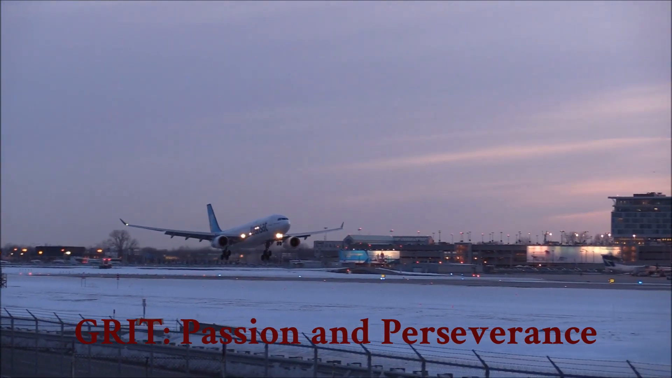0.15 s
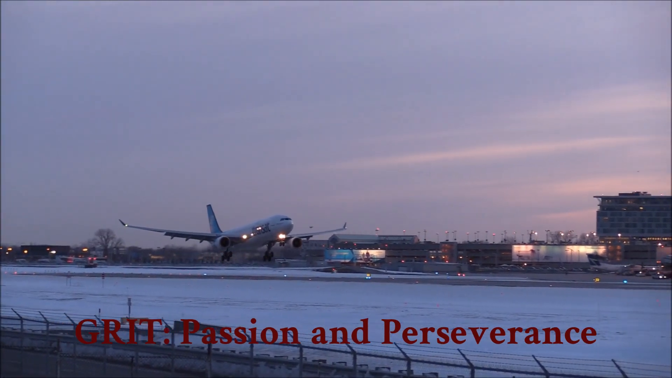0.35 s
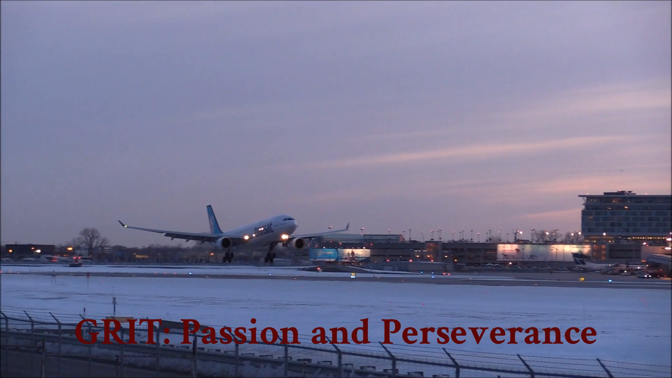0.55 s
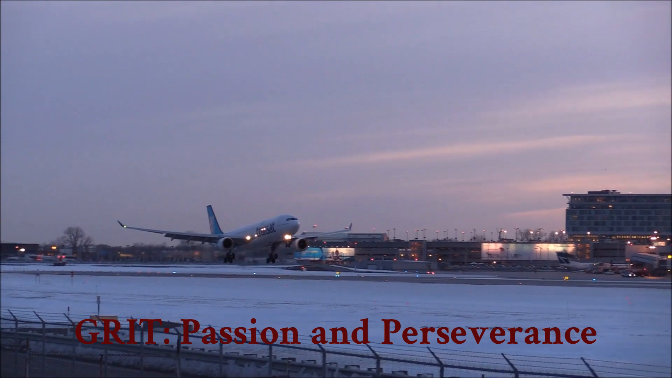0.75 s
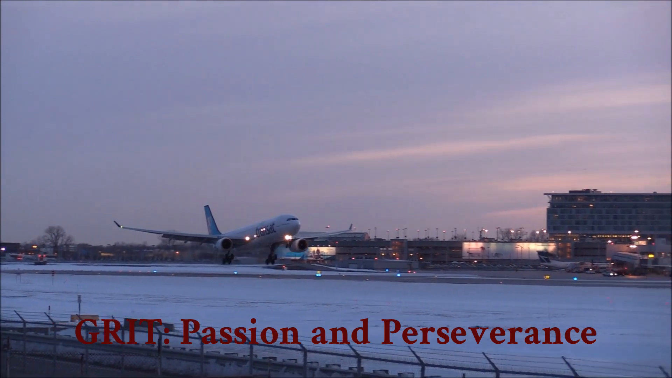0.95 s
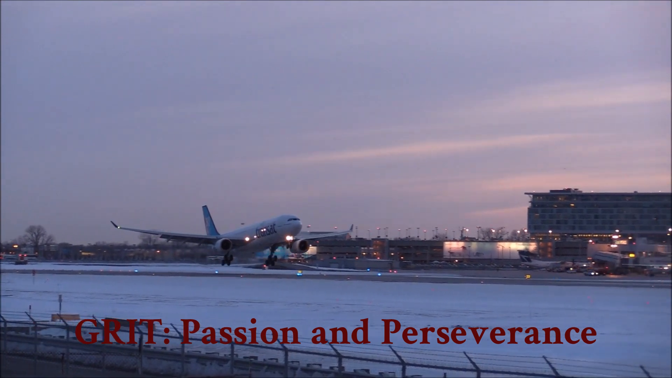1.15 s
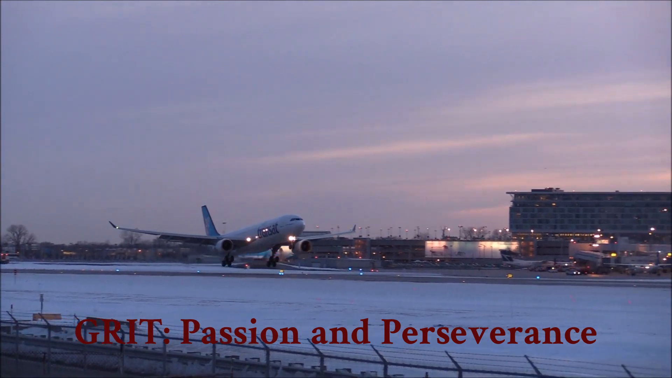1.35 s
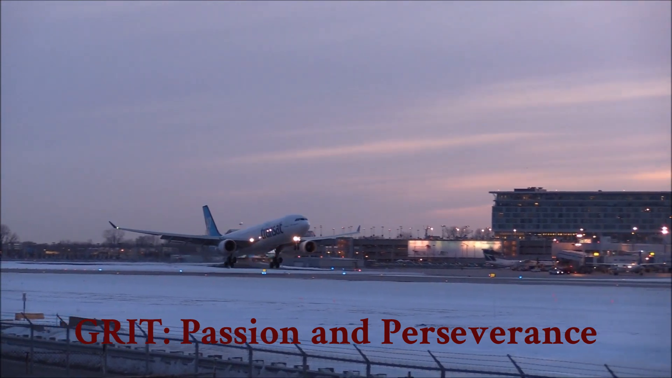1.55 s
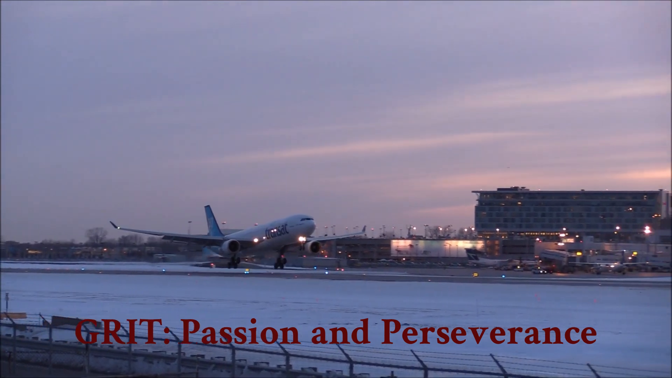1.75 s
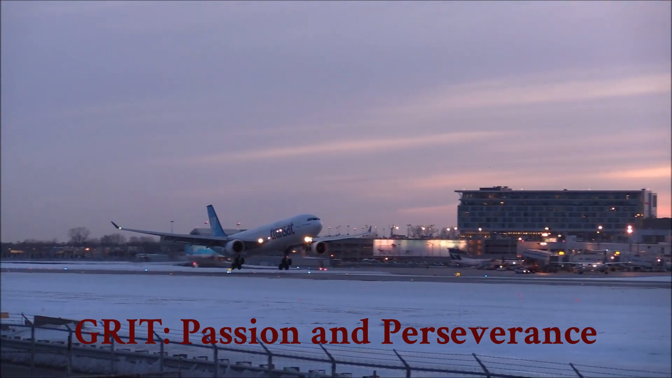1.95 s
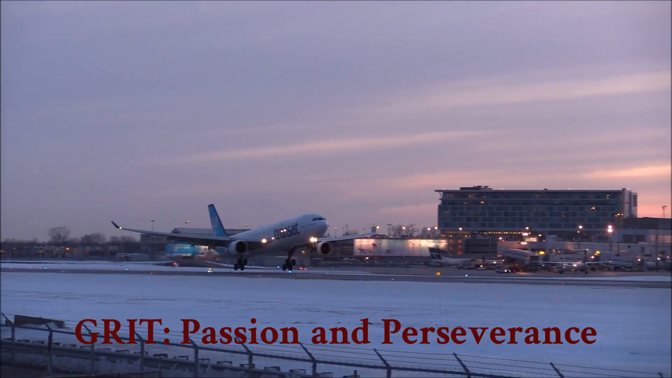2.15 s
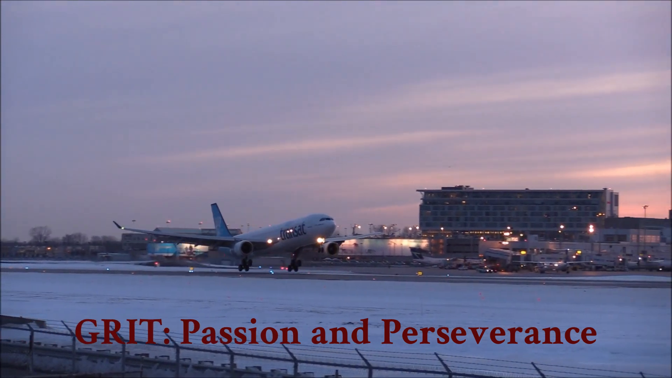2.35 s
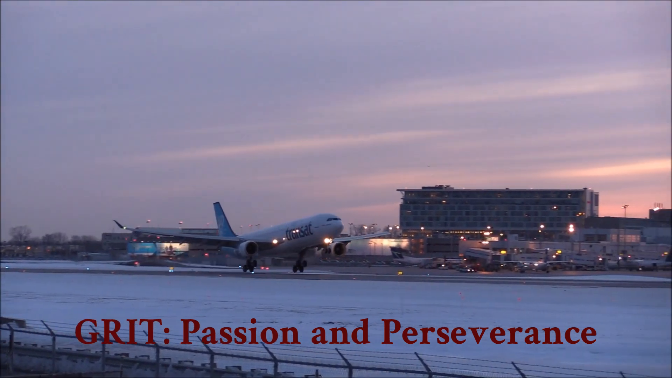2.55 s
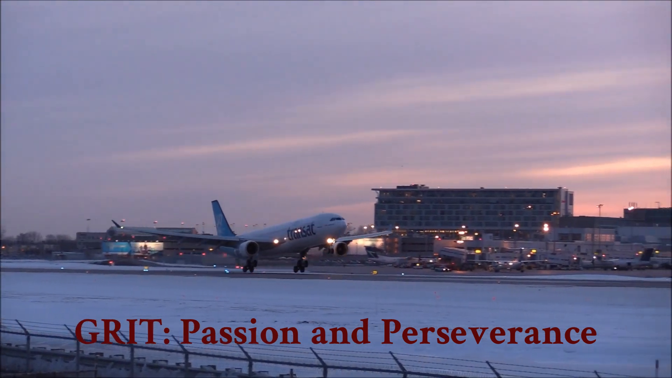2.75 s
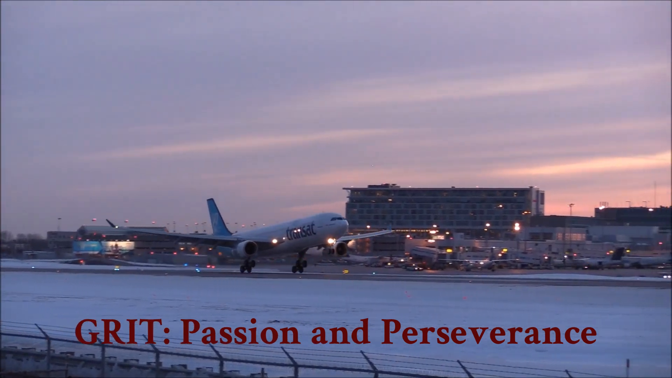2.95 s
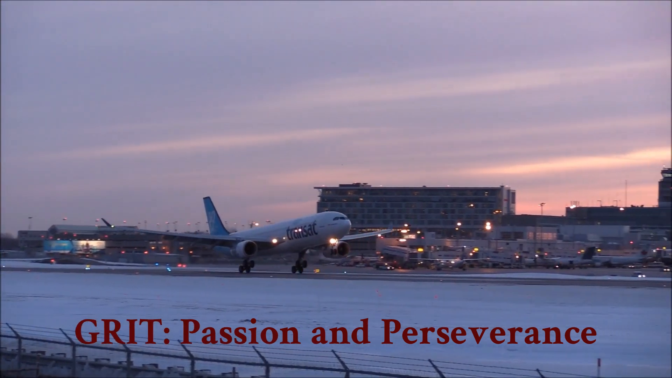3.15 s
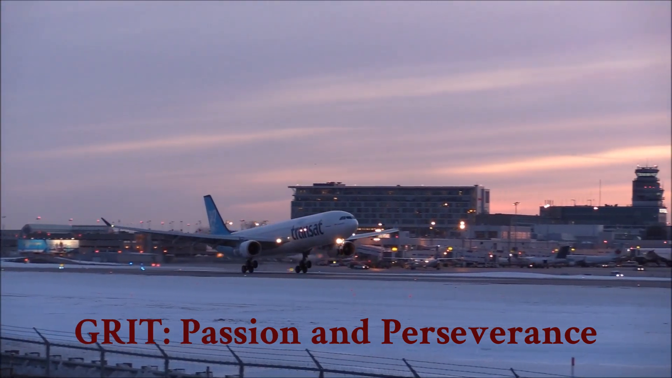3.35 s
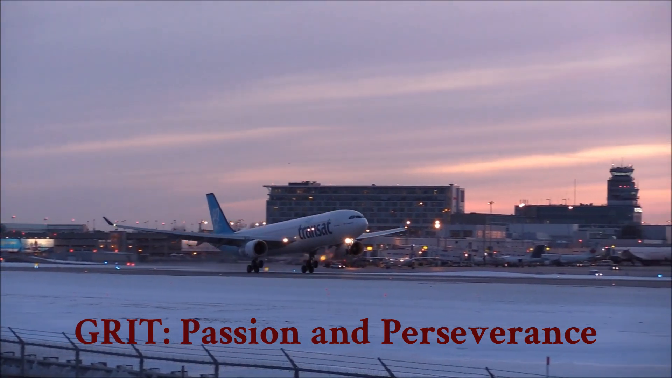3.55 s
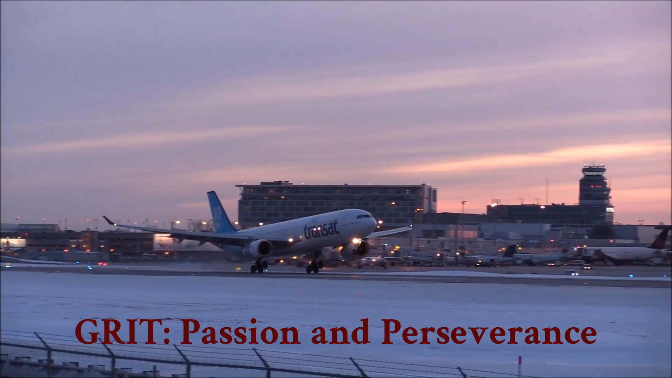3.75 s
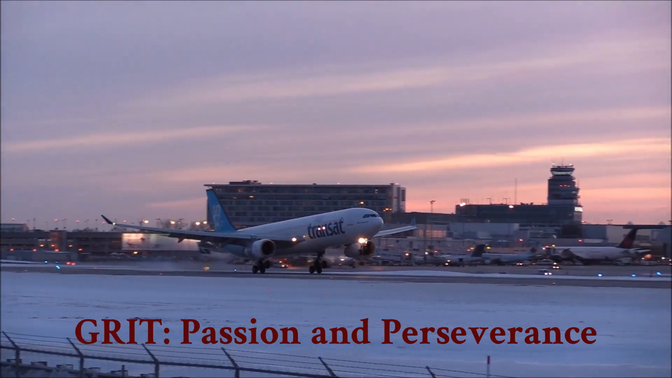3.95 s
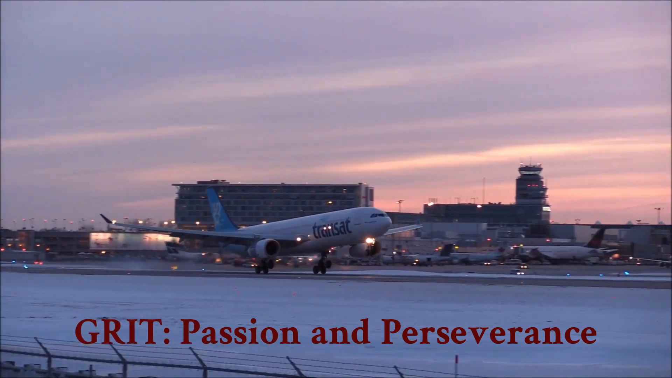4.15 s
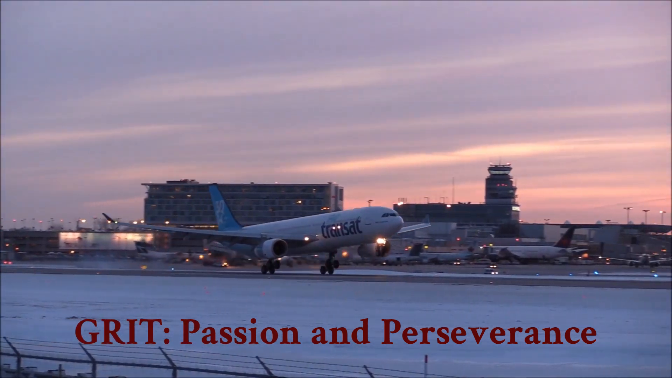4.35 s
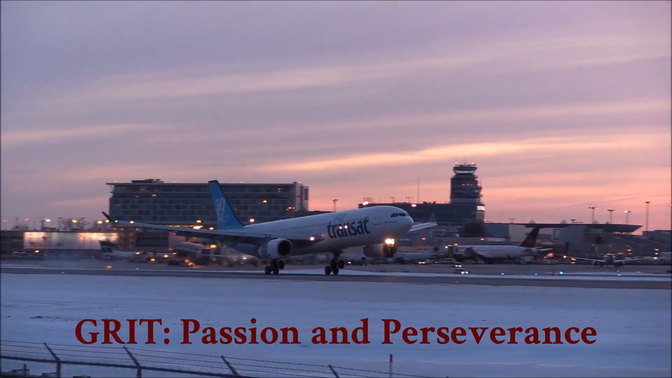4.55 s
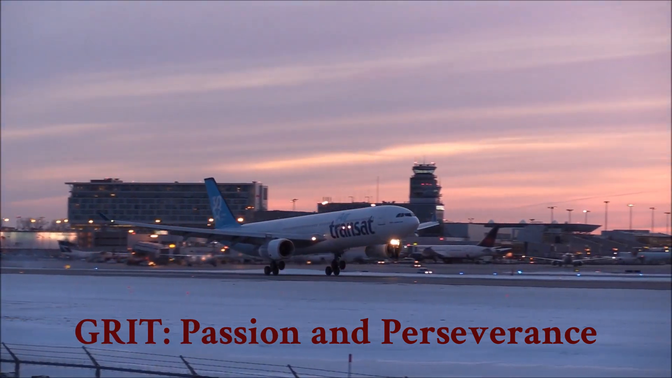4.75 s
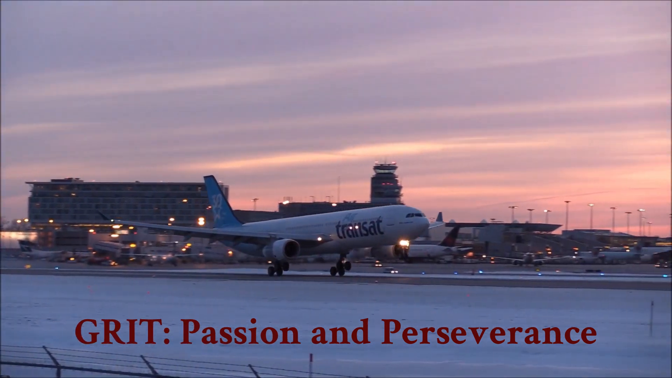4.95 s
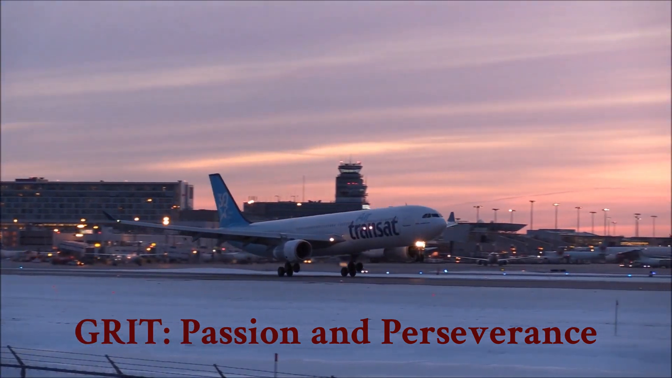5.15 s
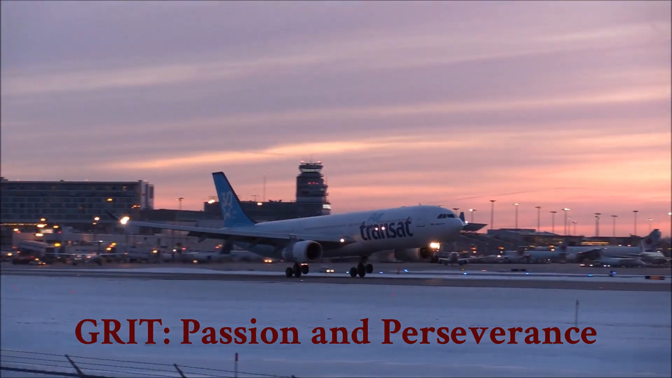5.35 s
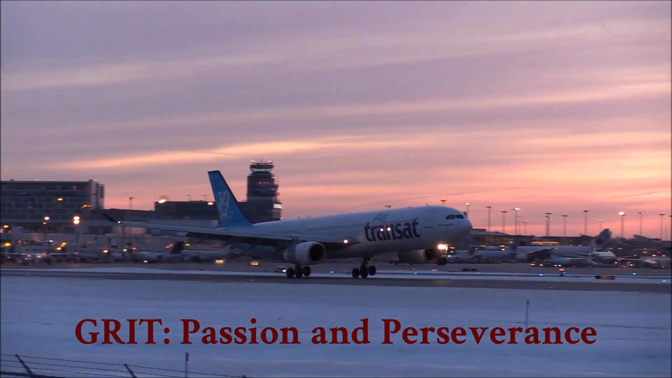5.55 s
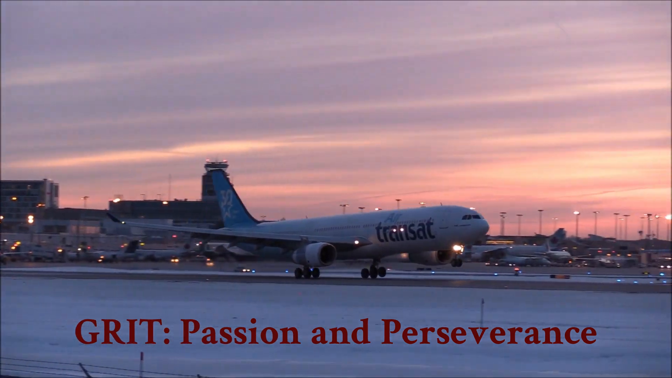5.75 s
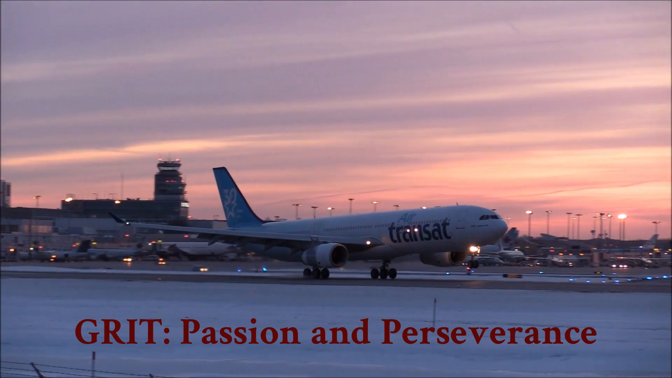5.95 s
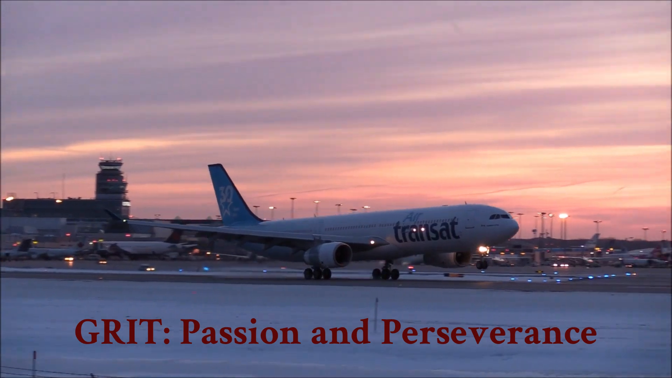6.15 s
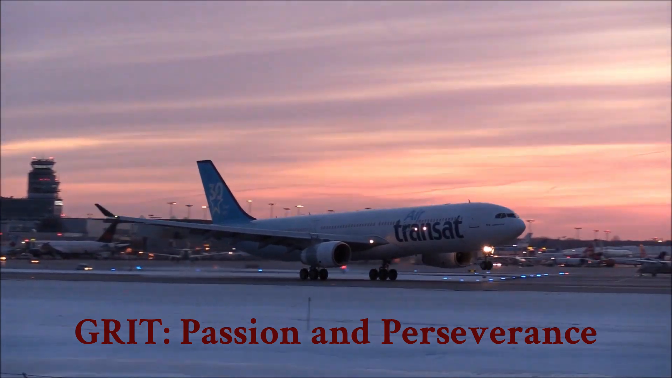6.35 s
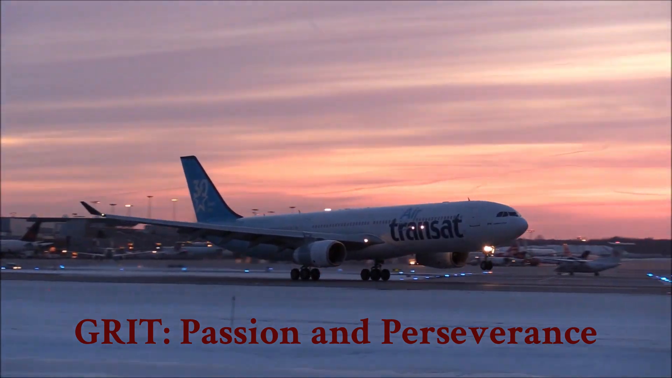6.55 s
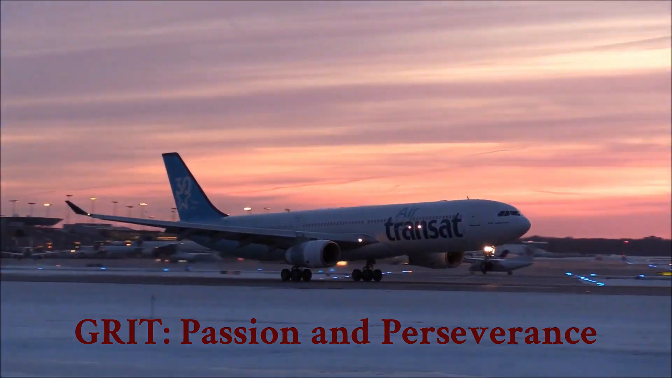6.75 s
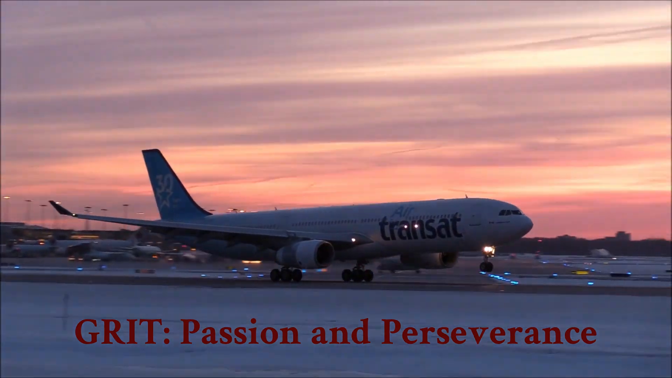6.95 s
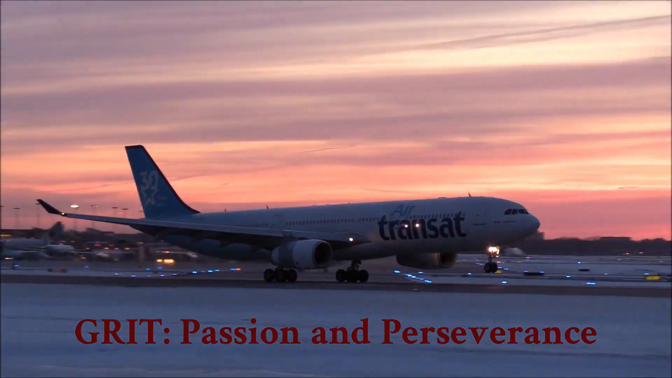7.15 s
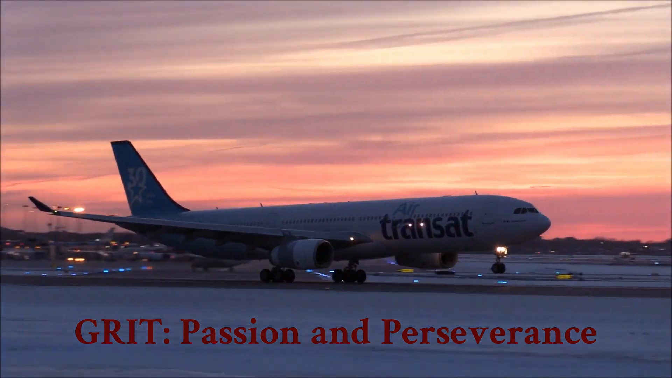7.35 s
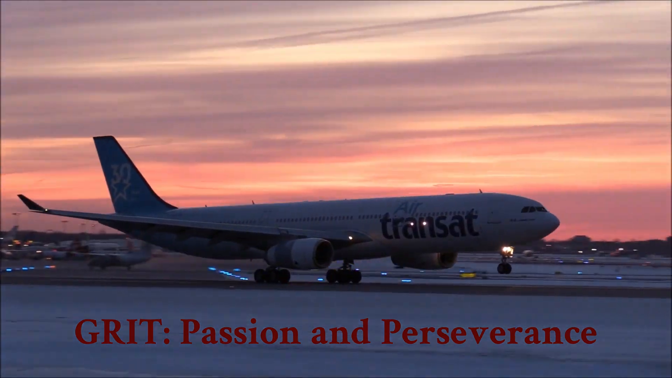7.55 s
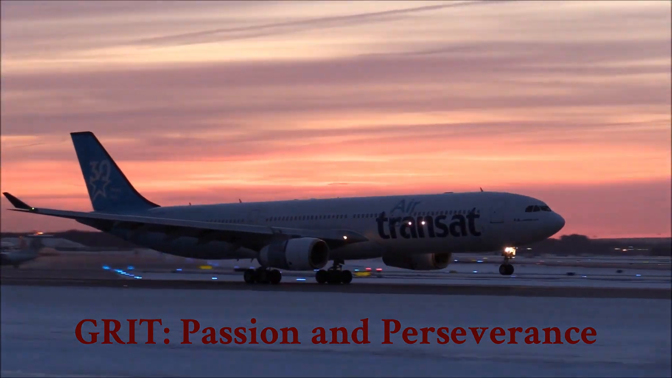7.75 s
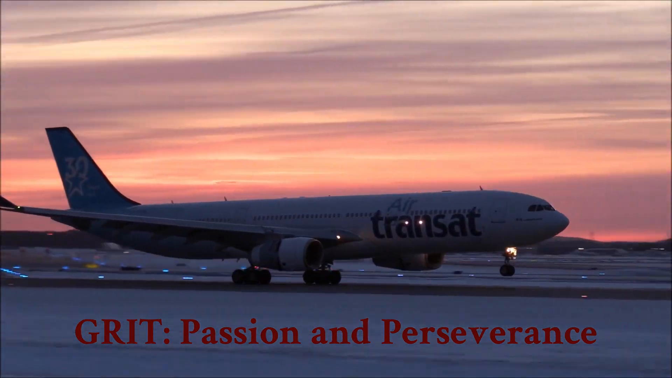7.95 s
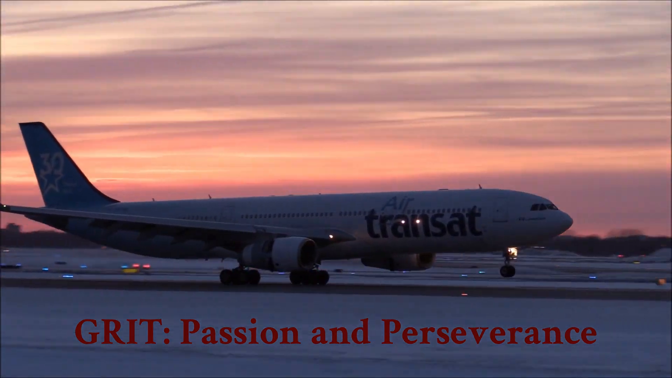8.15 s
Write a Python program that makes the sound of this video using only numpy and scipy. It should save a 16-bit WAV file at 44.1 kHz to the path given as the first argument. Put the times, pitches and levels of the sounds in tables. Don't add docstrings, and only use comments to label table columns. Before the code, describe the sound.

Twin-engine jet touches down, its fan whine pulsing and sagging in pitch, then reverse thrust swells into a broad, bright roar heard from the fence.

```python
import sys
import numpy as np
from scipy import signal
from scipy.io import wavfile
from scipy.ndimage import uniform_filter1d, minimum_filter1d

SR = 44100
rng = np.random.default_rng(int(sys.argv[2]) if len(sys.argv) > 2 else 0)


def undo_db(level):
    steps = np.asarray(level, float) / 20
    return 10 ** steps


def materialize(psi):
    bounded = np.clip(np.atleast_2d(psi).T, -1, 1)
    quanta = np.round(bounded * 32767).astype(np.int16)
    wavfile.write(sys.argv[1], SR, quanta)


N = 362053
FRAME, HOP = 2048, 512

# time in seconds, roar in dB, how far the inlets face the fence (0-1).
JET = [(0, -32.5, 0.1), (.7, -33, 0.2), (1.1, -34, .2), (1.8, -29.5, .15), (2.0, -29.5, 0),
       (2.45, -26.5, .25), (2.7, -26, .7), (3.2, -24.5, .8), (3.65, -23, 0.9), (4.1, -25, 0.9),
       (4.5, -21, 0.7), (5.2, -19.5, .8), (5.5, -17, .65), (6.15, -15.5, 0.3), (6.55, -11.5, 0),
       (6.9, -14, 0.3), (7.25, -9.5, 0), (8.21, -9.5, .15)]
# frequency in Hz, level in dB per Hz.
JET_COLOUR = [(60, -32), (130, -13), (280, -4), (450, -5), (800, 1), (1100, 1), (1190, -6), (1420, -7),
              (1700, -15.5), (2000, -16), (2350, -22.5), (2600, -24.5), (4000, -44.5), (7500, -73.5)]
# time and half length in seconds, change in dB.
CLEAR_AIR = [(3.1, 0.09, 6), (3.25, 0.04, -8), (3.6, 0.14, 7.5), (3.98, 0.13, 8.5), (4.25, 0.076, -4),
             (4.52, 0.09, 9), (5.95, 0.041, 0), (6.12, 0.11, 6), (6.45, 0.06, 3), (6.97, 0.081, 6.5),
             (7.25, 0.12, 4.5), (7.9, 0.21, 5.5)]
# frequency in Hz, width in Hz, boost in dB.
HOUSING = [
    (295, 37, 3),
    (1126, 26, 3),
    (2365, 300, -3.5),
]
# time in seconds, delay in ms, strength (0-1).
GROUND = [
    (0, 6.3, 0),
    (5.6, 6.85, .05),
    (6.6, 7.05, .4),
    (8.0, 7.3, .4),
    (8.21, 7.34, .4),
]
# time in seconds, delay in ms.
VIEW = [(0, 1.03), (1.5, 1.06), (3.3, 1.14), (4.3, 1.22), (5.2, 1.32), (6.5, 1.42), (7.5, 1.48),
        (8.21, 1.53)]
# frequency in Hz, strength (0-1).
ECHO = [(300, .01), (650, .04), (900, .03), (1120, .16), (1350, .22), (1900, .29), (2400, .22), (2800, .1),
        (4500, .08)]
# frequency in Hz, left minus right in dB.
LEAN = [(300, .4), (800, .7), (1100, .3), (1400, 2), (2100, 3), (2700, .5), (4000, 0)]
# frequency in Hz, share of the power (0-1).
SCATTERED = [(100, .03), (300, .005), (900, .005), (1250, .025), (1700, .05), (2300, .1), (2800, .04),
             (3500, .1), (5000, .3)]
# time in seconds, factor on the scattered share.
BUILDINGS = [(0, 1.5), (1.5, 1.5), (2.5, .5), (4.3, .6), (5, 2.6), (5.8, 2.2), (6.5, 1.1), (8.21, 1.1)]
# time in seconds, blade tone in Hz.
FAN_SPEED = [
    (0, 983),
    (1.1, 1005),
    (1.9, 1006),
    (2.4, 1000),
    (2.75, 1002),
    (3.1, 977),
    (3.3, 948),
    (3.85, 854),
    (4.5, 760),
]
# time and half length in seconds, blade tone in dB, octave in dB.
FOCUS = [(.07, 0.061, -36.5, -59), (.7, 0.08, -38.5, -67), (1.15, 0.11, -33.5, -63),
         (1.55, 0.13, -37.5, -61), (1.7, .05, -30.5, -56), (1.9, 0.043, -32, -53), (2.13, 0.13, -34, -57),
         (2.43, 0.051, -23.5, -47), (2.6, 0.064, -32, -49), (2.73, 0.078, -28.5, -44.5),
         (2.922, 0.039, -21.5, -37.5), (3.072, 0.079, -20.5, -33), (3.222, 0.044, -15.5, -35),
         (3.334, 0.046, -17, -37), (3.48, 0.058, -19, -45), (3.57, 0.028, -34, -32),
         (3.7, 0.078, -25, -30.5), (3.85, 0.055, -32, -33.5), (3.93, 0.068, -28.5, -34),
         (4.01, 0.073, -55, -33.5), (4.13, .07, -45, -31), (4.24, .04, -45, -39), (4.38, 0.021, -25, -36)]
# time in seconds, level in dB.
DRONE = [(0, -51), (.2, -42.5), (.65, -43), (.9, -47), (1.55, -48.5), (1.8, -41), (2.35, -46), (2.7, -40.5),
         (3.3, -46), (4.2, -51), (5.2, -53)]
# frequency in Hz, level in dB.
AIRFIELD = [(60, -48), (100, -35), (300, -24), (900, -21), (1600, -34), (2000, -38.5), (3000, -56.5),
            (5000, -78), (7000, -110)]
# frequency in Hz, level in dB.
HISS = [(1500, -76), (3000, -60.5), (5000, -57), (7000, -60.5), (8500, -64), (12000, -70), (16000, -71)]
# frequency in Hz, threshold in
GAPS_FAINT = [(6600, -3.5), (7500, .6), (8500, 1.1), (11500, .9), (12500, 0), (14800, -.1), (15500, 1)]
# frequency in Hz, threshold in spreads.
GAPS_LOUD = [(4200, -3.5), (5200, -1.3), (6200, -.3), (8000, 0), (10000, -.5), (14000, -.6), (15300, 1.5)]


def evened(x):
    return x / np.sqrt(np.mean(x ** 2) + 1e-20)


def read(points, hz):
    f, value = np.transpose(points)
    return np.interp(np.log(hz + 1), np.log(f + 1), value)


def columns(rows, t):
    s, *values = np.transpose(rows)
    return [np.interp(t, s, v) for v in values]


def over_time(points, hz, change_db):
    return np.outer(read(points, hz), change_db)


def drift(top_hz):
    t = np.arange(0, N, 64) / SR
    rates = np.geomspace(top_hz / 10, top_hz, 24)
    slow = sum(np.sin(2 * np.pi * (f * t + rng.random())) for f in rates)
    return np.interp(np.arange(N) / SR, t, evened(slow))


def blotches(shape, bins, frames):
    across_hz = uniform_filter1d(rng.standard_normal(shape), bins, axis=-2)
    return evened(uniform_filter1d(across_hz, frames, axis=-1))


def white_pair():
    return signal.stft(rng.standard_normal((2, N)), SR, nperseg=FRAME, noverlap=FRAME - HOP)


def sound(z):
    return signal.istft(z, SR, nperseg=FRAME, noverlap=FRAME - HOP)[1][:, :N]


def per_band(shape_db, hz, lo, hi):
    inside = (hz >= lo) & (hz < hi)
    power = (undo_db(shape_db) ** 2)[inside].sum() / len(hz)
    return shape_db - 10 * np.log10(power)


def ports(hz, t):
    delay_ms = columns(VIEW, t)[0]
    echo = read(ECHO, hz) * np.exp(-2j * np.pi * hz * delay_ms / 1000)
    lean = undo_db(read(LEAN, hz) / 2)
    return np.array([lean * (1 + echo), (1 - echo) / lean])


def tone(hz, level_db, twinkle_db, twinkle_hz, wobble):
    phase = 2 * np.pi * np.cumsum(hz) / SR + wobble * drift(twinkle_hz)
    level = np.sqrt(2) * undo_db(level_db + twinkle_db * drift(twinkle_hz))
    wave = level * np.exp(1j * phase)
    return (wave * ports(hz, np.arange(N) / SR)).real


def fans():
    t = np.arange(N) / SR
    hz, = columns(FAN_SPEED, t)
    coarse = t[::64]
    swells = 0
    for s, half, tone_db, octave_db in FOCUS:
        swells = swells + np.outer(undo_db([tone_db, octave_db]), np.exp(-((coarse - s) / half) ** 2))
    first_db, second_db = (np.interp(t, coarse, 20 * np.log10(v + undo_db(-61))) for v in swells)
    third_db = second_db - 20 - 40 * abs(t - 3.92)
    whine = tone(hz, first_db, 2.0, 30, .35)
    whine = whine + tone(2 * hz, second_db, 2.5, 30, .5)
    whine = whine + tone(3 * hz, third_db, 3.0, 25, .8)
    alive = np.clip((FOCUS[-1][0] + .1 - t) / .2, 0, 1)
    return alive * whine


def roar():
    hz, t, (common, apart) = white_pair()
    roar_db, facing = columns(JET, t)
    nearest_db, air_loss = -9, .22
    inlet_db = 13.5 * facing
    treble_db = 10.5 * facing + air_loss * (roar_db - nearest_db)
    treble_db = treble_db + sum(db * np.exp(-((t - s) / half) ** 2) for s, half, db in CLEAR_AIR)

    idle_db, reverse_db, reverse_s, rise_s = -24.5, -13, 5.31, .48
    thrust = 1 / (1 + np.exp((reverse_s - t) / rise_s))
    rumble_db = idle_db + (reverse_db - idle_db) * thrust - roar_db

    field_db = per_band(read(JET_COLOUR, hz), hz, 600, 1150)[:, None] + roar_db
    field_db = field_db + over_time([(1900, 0.051), (2400, 0.48), (4500, 0.56)], hz, treble_db)
    field_db = field_db + over_time([(100, 1.3), (300, 0.96), (480, 0.92), (750, 0)], hz, rumble_db)
    field_db = field_db + over_time([(1100, 0.027), (1300, 0.7), (1900, 0.6), (2400, 0.21)], hz, inlet_db)
    distance_tilt = [(1010, -0.028), (1080, 0.17), (1350, 0.32), (1750, -0.29),
                     (2050, 0.13), (3000, 0.21), (6000, 0.93)]
    field_db = field_db + over_time(distance_tilt, hz, roar_db + 11)
    field_db = field_db + read([(7200, 0), (9500, -30)], hz)[:, None]
    ridges = sum(db / (1 + (2 * (hz - f) / width) ** 2) for f, width, db in HOUSING)
    field_db = field_db + ridges[:, None]

    field_db = field_db + .86 * blotches(common.shape, 25, 8)
    flicker = evened(uniform_filter1d(rng.standard_normal(len(t)), size=3))
    field_db = field_db + over_time([(2500, .5), (5000, 1.0)], hz, flicker)

    delay_ms, strength = columns(GROUND, t)
    bounce = over_time([(450, 0), (650, 1), (1150, 1), (1500, 0)], hz, strength)
    common = common * (1 - bounce * np.exp(-2j * np.pi * np.outer(hz, delay_ms) / 1000))

    share = np.clip(over_time(SCATTERED, hz, columns(BUILDINGS, t)[0]), 0, .5)
    direct = np.sqrt(1 - share) * common * ports(hz[:, None], t)
    scattered = np.sqrt(share) * np.array([apart, -apart])
    return sound((direct + scattered) * undo_db(field_db))


def drone():
    t = np.arange(N) / SR
    hz = 96.4 - 1.12 * t
    level_db = columns(DRONE, t)[0]
    alive = np.clip((DRONE[-1][0] - t) / .4, 0, 1)
    return alive * (tone(hz, level_db, 1.7, 9.5, 0.25) + tone(2 * hz, level_db - 0.5, 1.4, 2.7, 0.48))


def airfield():
    hz, t, z = white_pair()
    return sound(z * undo_db(read(AIRFIELD, hz))[:, None])


def wind():
    hz, t, z = white_pair()
    colour = [(15, -35.0), (28, -4.5), (45, -12), (70, -0.5), (130, -1.0), (300, -40), (900, -75)]
    shape_db = per_band(read(colour, hz), hz, 20, 75)
    lumps = evened(uniform_filter1d(rng.standard_normal(len(t)), size=25))
    level_db = -58 + 1.04 * t + 1.5 * lumps - 4.5
    mixed = z + .74 * z[::-1]
    return sound(mixed * undo_db(shape_db[:, None] + level_db))


def hiss():
    hz, t, z = white_pair()
    shared = read([(4000, .2), (7000, 0), (12000, .3)], hz)[:, None]
    swell_db = over_time([(6000, 0), (9000, 0.12)], hz, columns(JET, t)[0] + 31)
    return sound((z + shared * z[::-1]) * undo_db(read(HISS, hz)[:, None] + swell_db))


def gust():
    hz, t, z = white_pair()
    start_s, rise_s, hold_s = 4.3, .4, .7
    colour = [(30, -20.5), (70, -5.5), (130, 4.0), (170, -14.0), (400, -47), (900, -79.0)]
    shape_db = per_band(read(colour, hz), hz, 60, 200)
    level_db = -46 - 24 * np.maximum(start_s - t, 0) / rise_s
    level_db = level_db - 27.5 * np.maximum(t - start_s - hold_s, 0)
    return sound(z[:1] * undo_db(shape_db[:, None] + level_db)) * [[1], [-.6]]


def patchy_treble(x):
    hz, t, z = signal.stft(x, SR, nperseg=FRAME, noverlap=FRAME - HOP)
    quiet_db, loud_db, shut_db = -30, -20, -30
    loud = np.clip((columns(JET, t)[0] - quiet_db) / (loud_db - quiet_db), 0, 1)
    threshold = over_time(GAPS_FAINT, hz, 1 - loud) + over_time(GAPS_LOUD, hz, loud)
    chance = evened(blotches(z[0].shape, 36, 4) + .6 * blotches(z[0].shape, 300, 3))
    return sound(z * np.where(chance < threshold, undo_db(shut_db), 1))


def scene():
    return fans() + roar() + drone() + airfield() + wind() + hiss() + gust()


def roll_off(x):
    return signal.sosfilt(signal.butter(12, 15720, fs=SR, output="sos"), x)


def record(dry):
    room = minimum_filter1d(np.minimum(.93 / (abs(dry).max(0) + 1e-9), 1), 601)
    gain = uniform_filter1d(uniform_filter1d(room, 300), 300)
    return roll_off(patchy_treble(dry * gain))


dry = scene()
out = record(dry)
materialize(out)
```